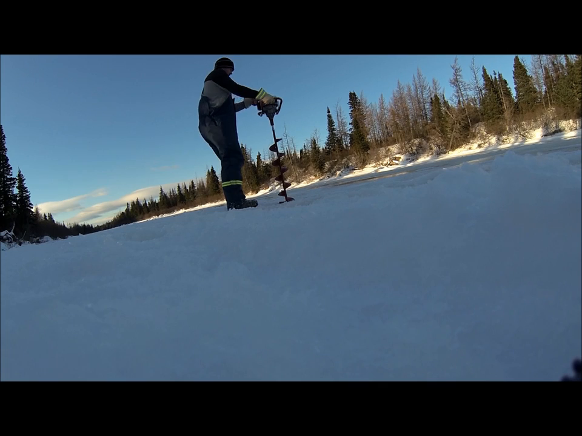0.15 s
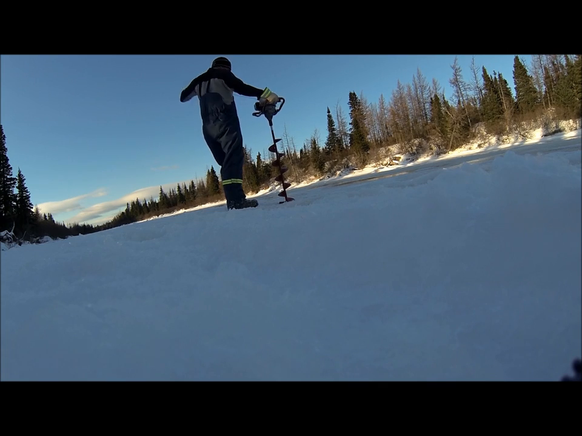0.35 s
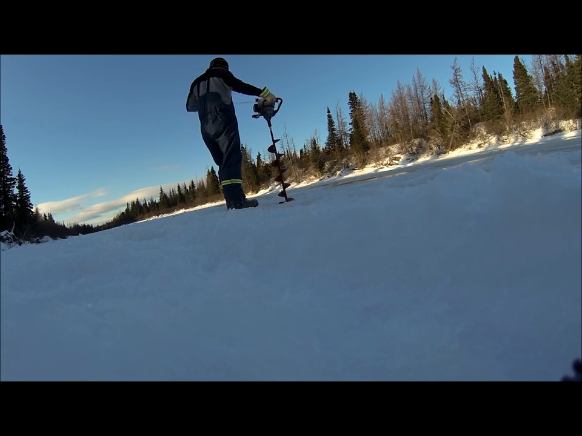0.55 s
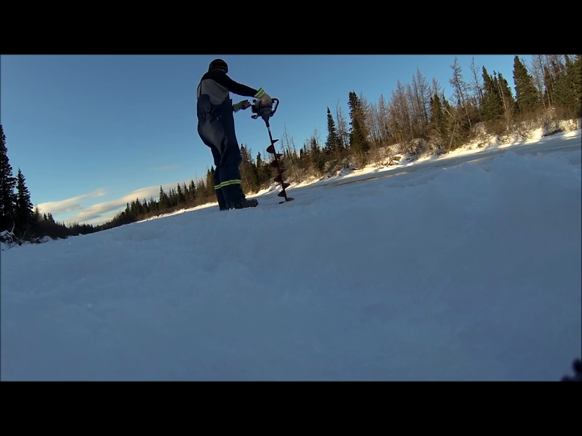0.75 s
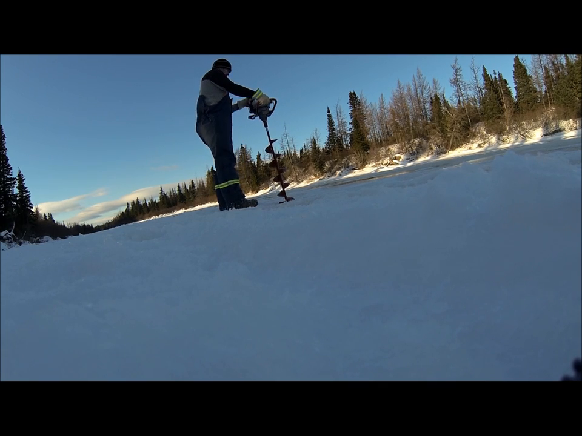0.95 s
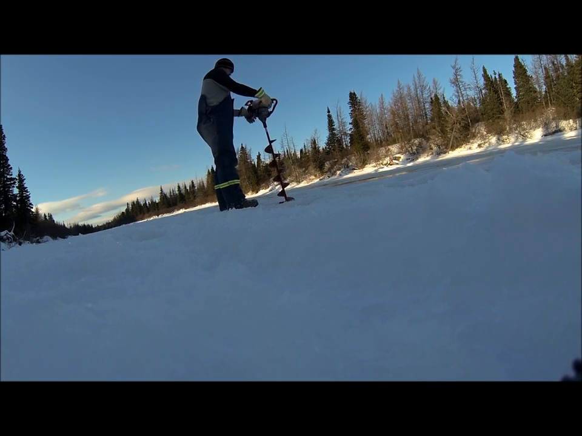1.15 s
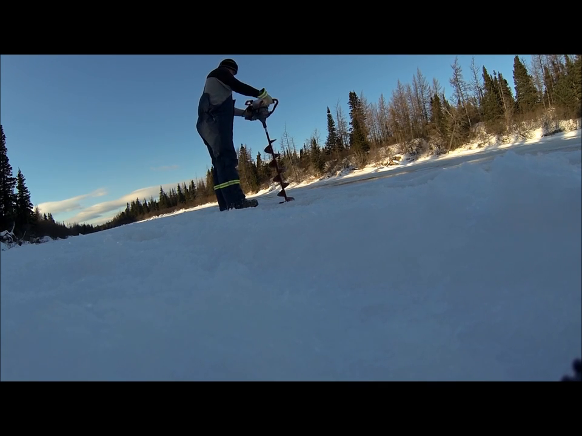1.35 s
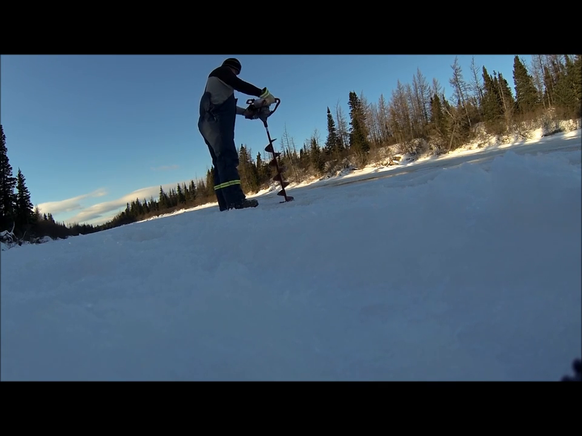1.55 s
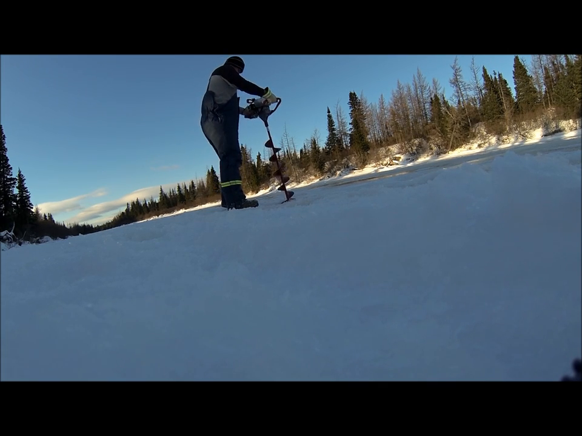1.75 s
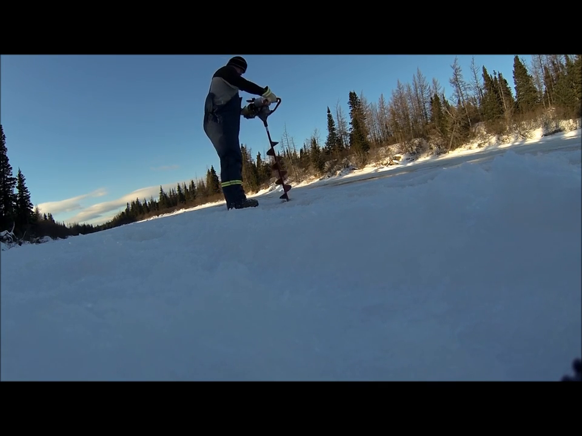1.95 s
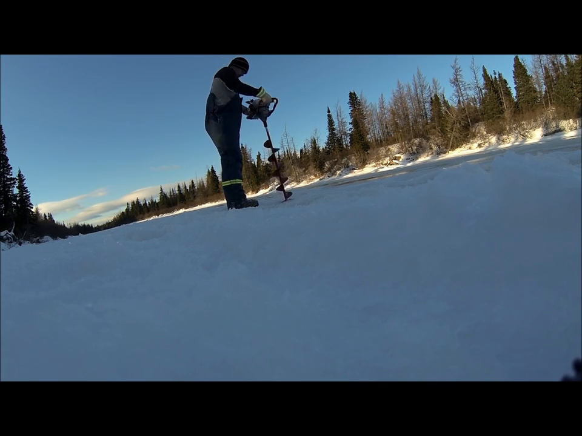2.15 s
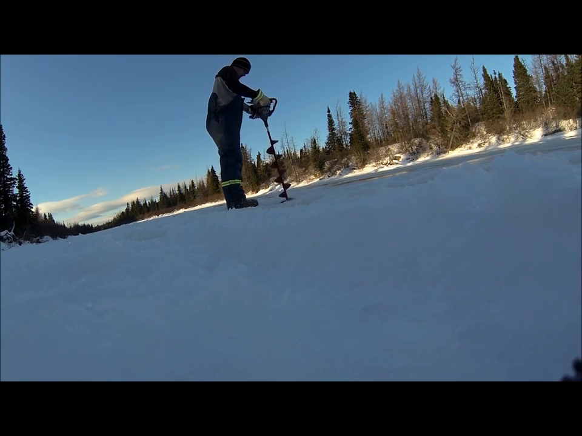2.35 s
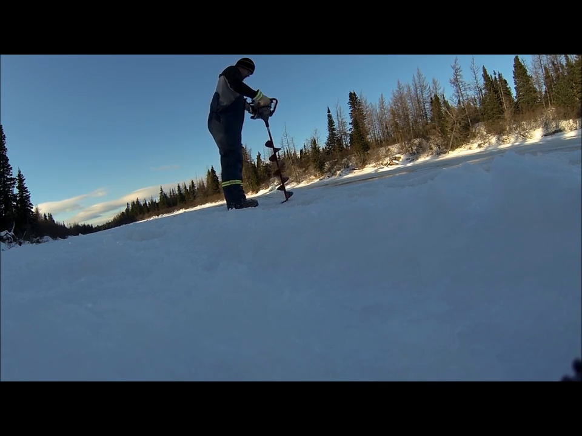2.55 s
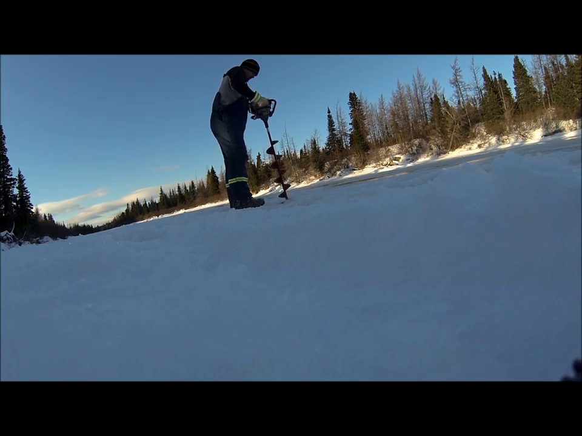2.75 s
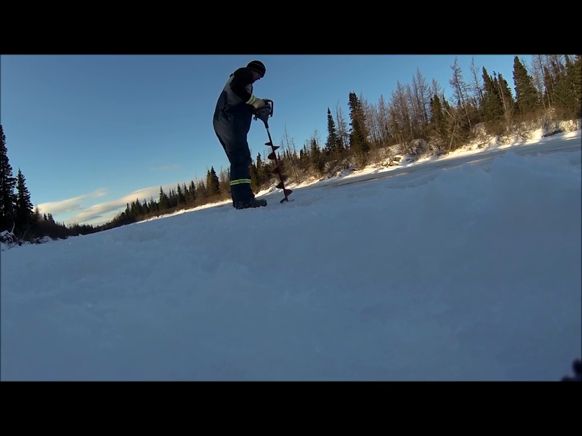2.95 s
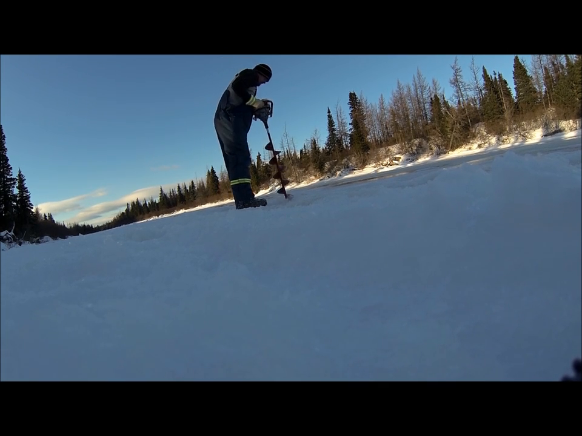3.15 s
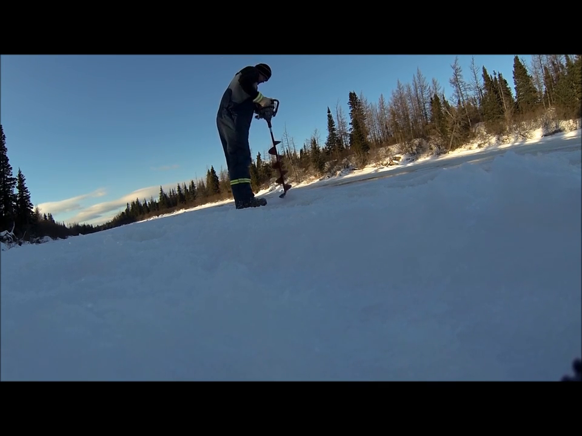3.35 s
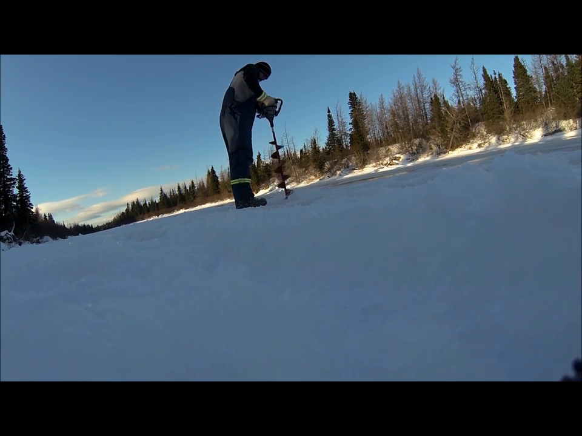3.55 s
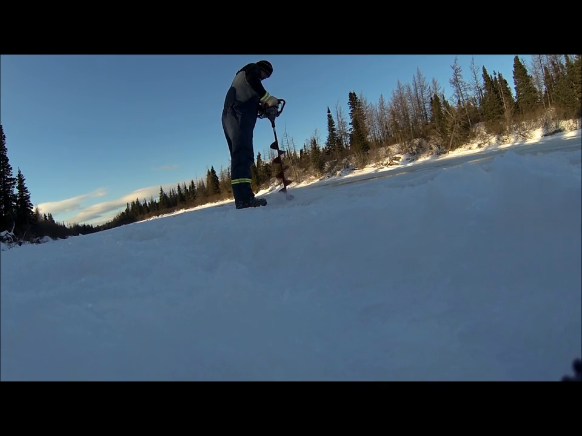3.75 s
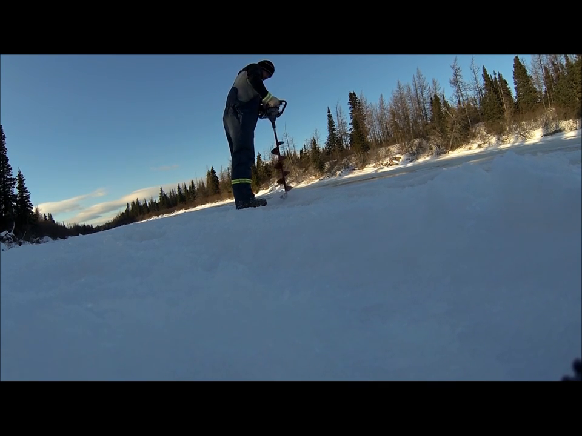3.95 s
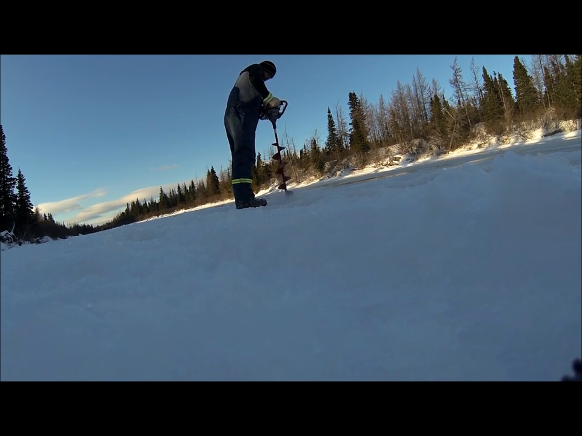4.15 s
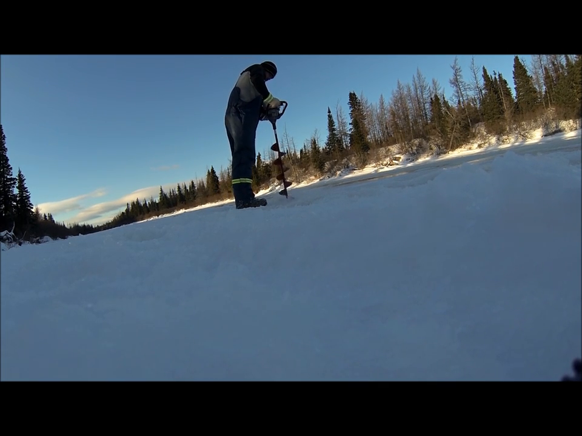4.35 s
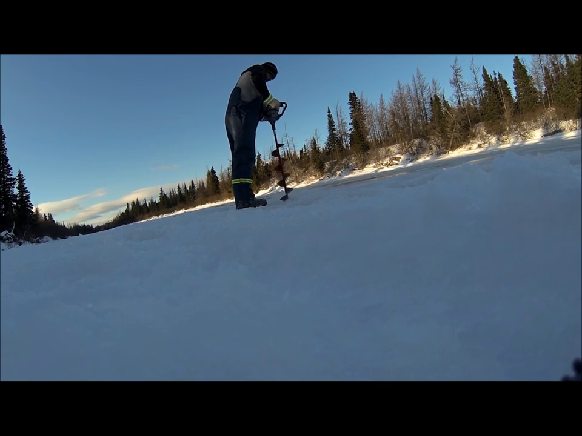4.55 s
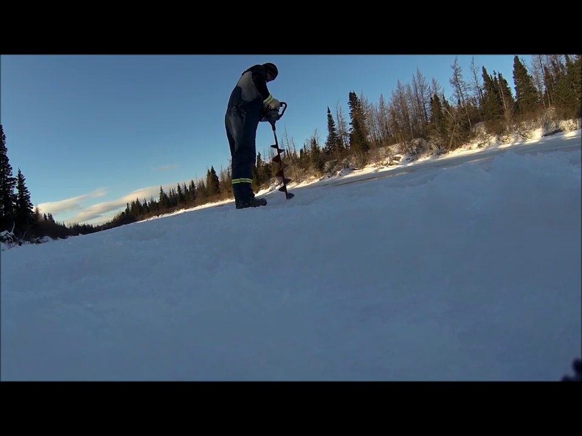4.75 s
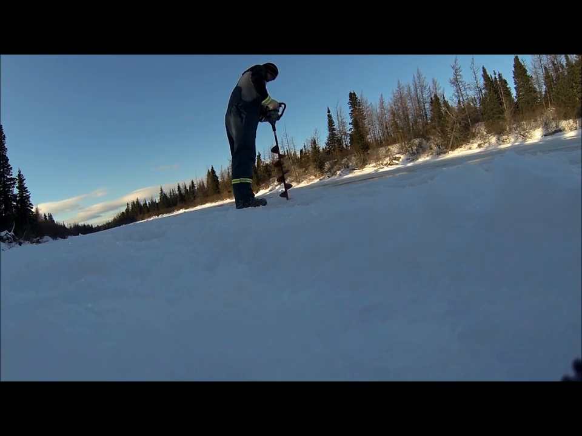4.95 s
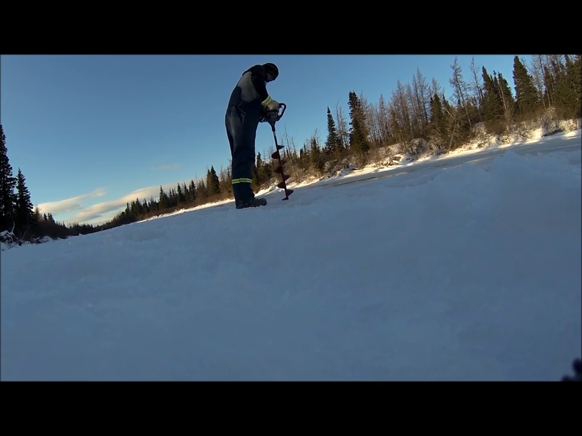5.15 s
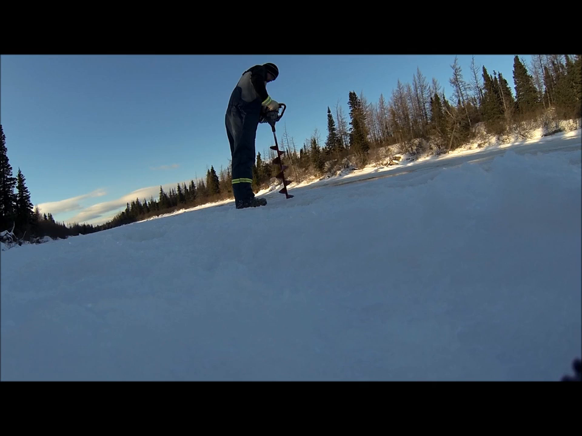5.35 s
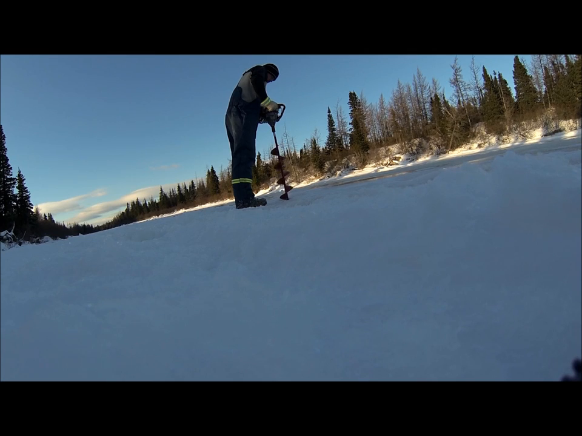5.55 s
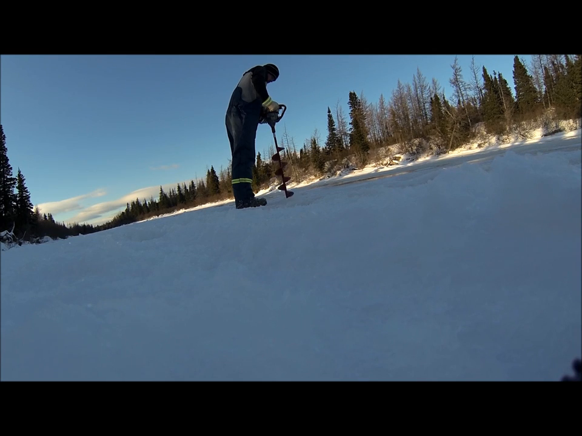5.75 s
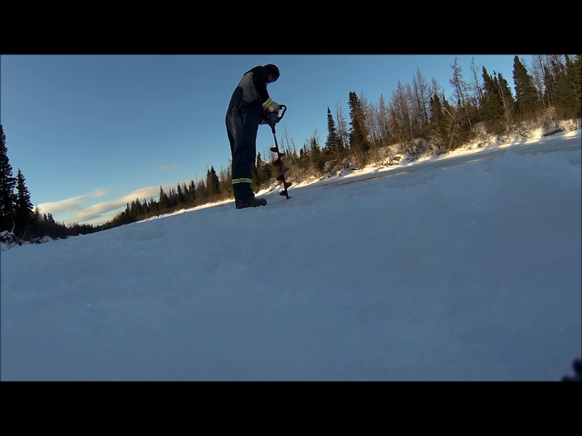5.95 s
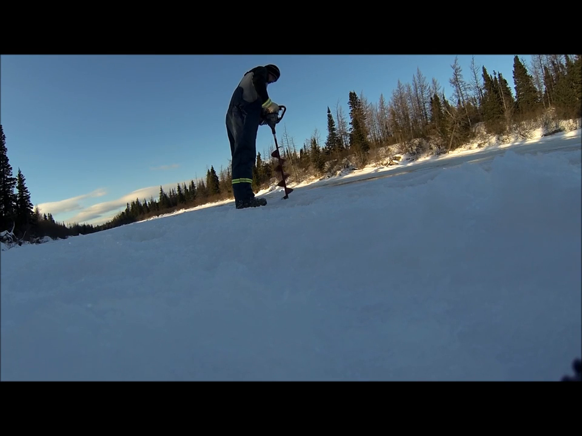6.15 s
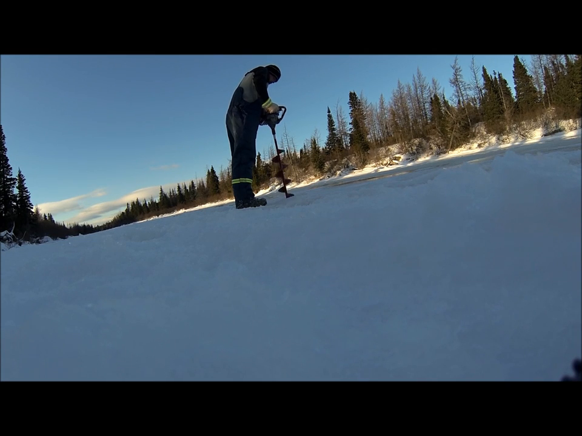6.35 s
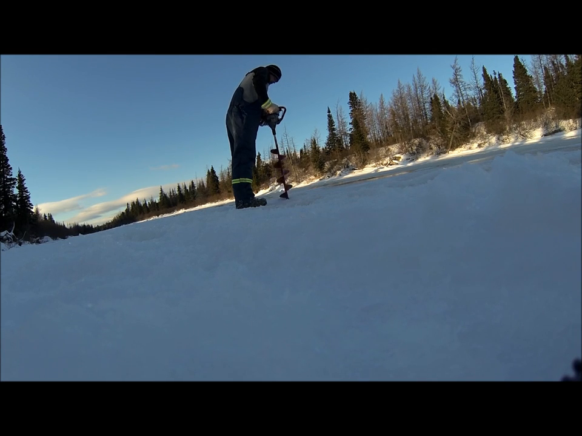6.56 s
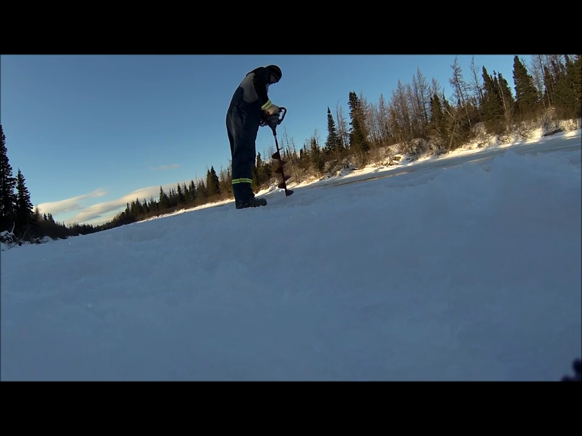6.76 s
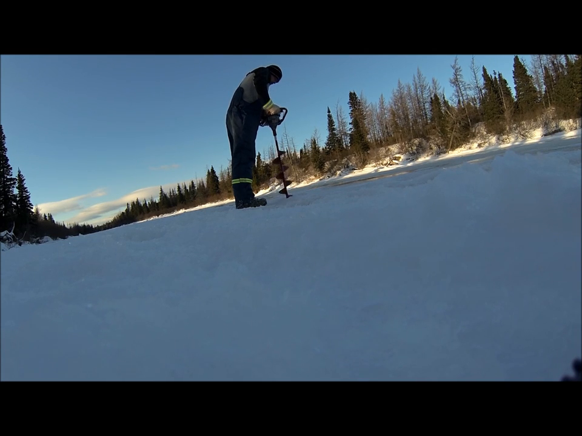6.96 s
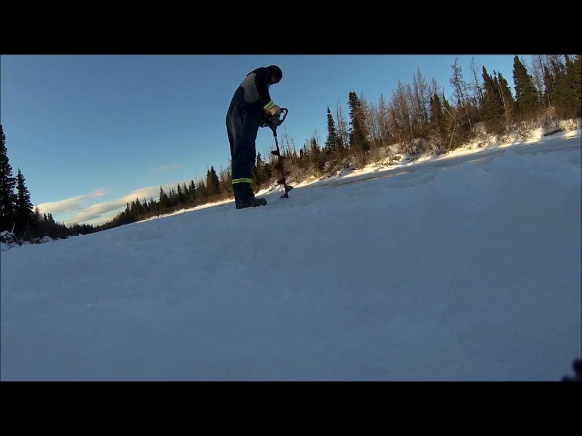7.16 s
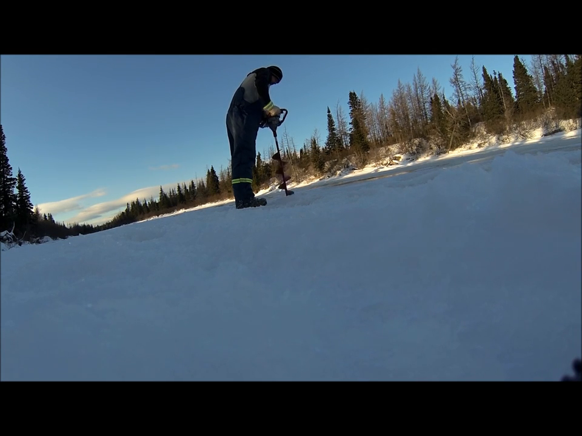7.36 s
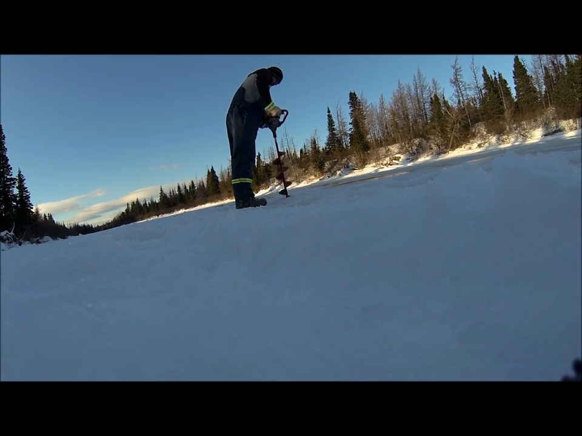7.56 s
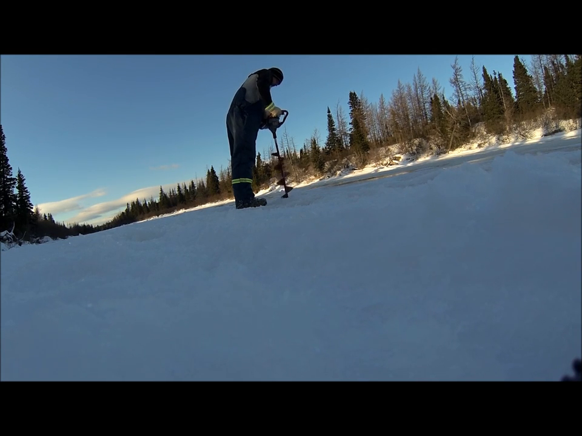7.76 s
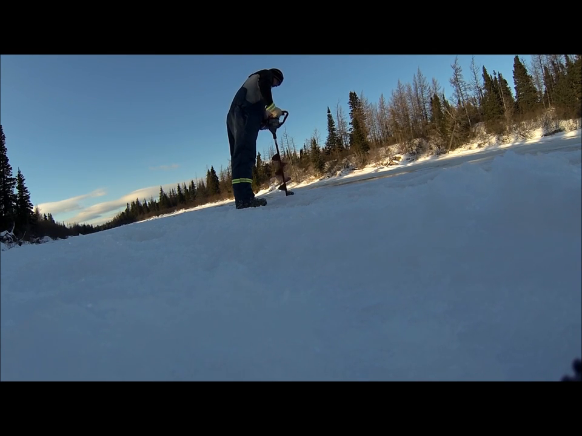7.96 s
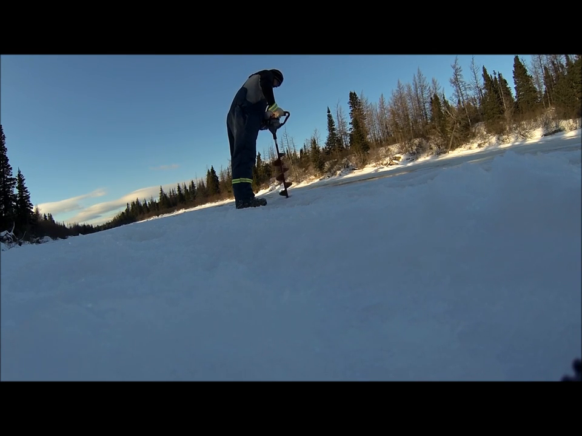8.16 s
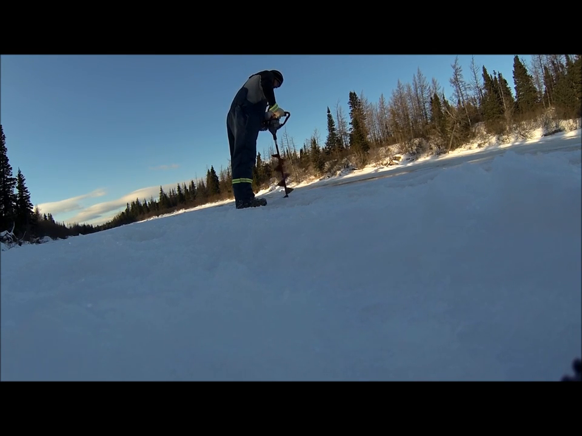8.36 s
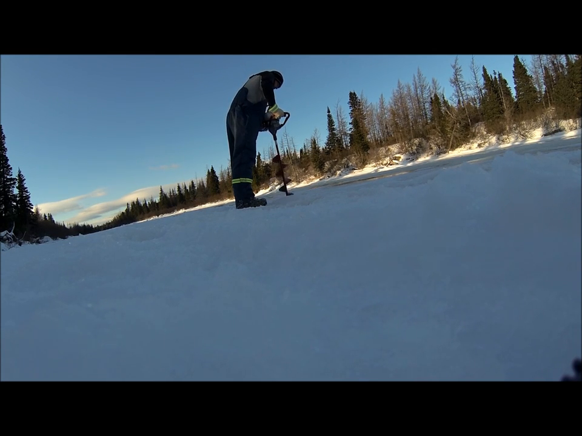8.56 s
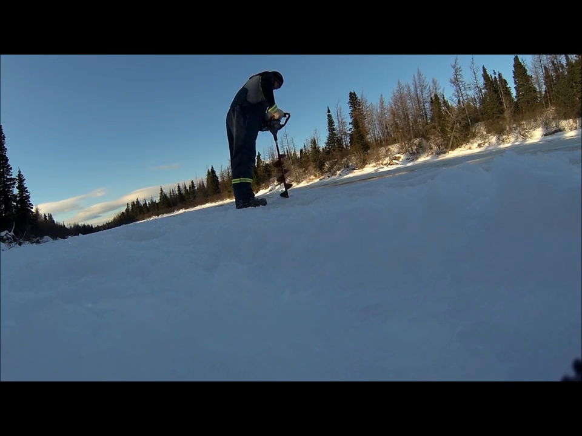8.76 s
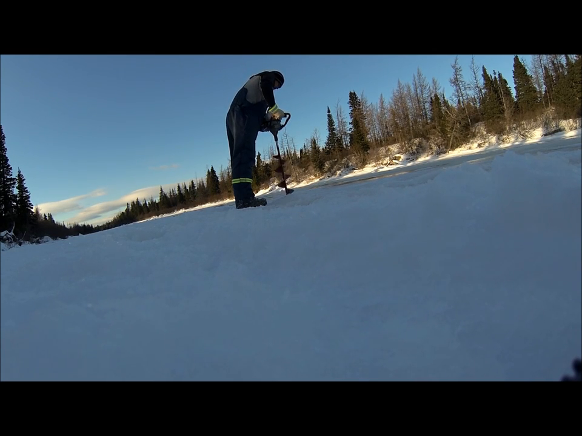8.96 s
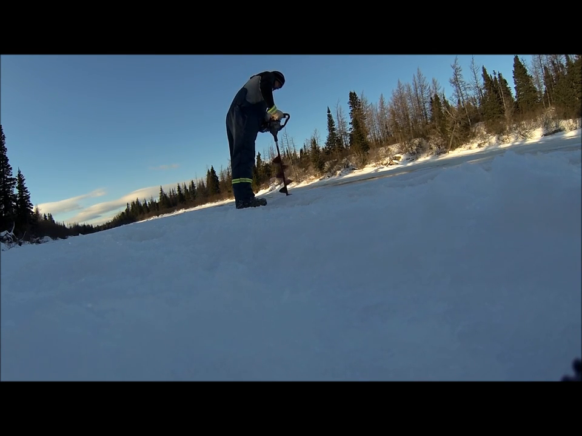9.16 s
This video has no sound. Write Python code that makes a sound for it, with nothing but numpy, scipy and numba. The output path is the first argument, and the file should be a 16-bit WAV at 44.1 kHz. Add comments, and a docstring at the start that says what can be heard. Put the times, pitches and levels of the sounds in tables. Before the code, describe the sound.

Starter clacks, a sputtering small engine catches and revs up into a harsh, buzzing drone, with faint metallic blade ringing and buffeting wind.

```python
"""Light wind buffets the microphone on a snowy lake throughout; first a two-stroke ice auger is pulled to life.
The starter clacks, the engine catches, is blipped twice and runs flat out while its blades ring on the ice.
Each turn puffs through the muffler; rich, the engine fires only every other turn; throttle shut, it coasts.
Puffs are filtered clicks, the casing rattles as shaken noise and struck rings, and hum and gears are sines.
At the end of the chain a gain control softens loud peaks."""
import sys
import numpy as np
from scipy import signal
from scipy.fft import rfft, irfft
from scipy.io import wavfile
from scipy.ndimage import uniform_filter1d
from numba import njit

SR = 44100
rng = np.random.default_rng(int(sys.argv[2]) if len(sys.argv) > 2 else 0)


def digitize_waveform(pressure):
    """Quantize a signal to 16-bit integers and store it at the path in sys.argv[1].

    Rows of a 2-D input are taken as channels; values are limited to [-1, 1].
    """
    field = np.atleast_2d(pressure).T
    bounded = np.clip(field, -1, 1)
    quanta = np.round(bounded * 32767).astype(np.int16)
    wavfile.write(sys.argv[1], SR, quanta)


N = 406602

# how the engine fires from each moment on: [t/s, fires once in so many turns (0 = coasting)]
FIRING = [(0, 0), (.72, 2), (1.06, 0), (1.31, 2), (1.53, 1), (1.67, 2), (1.77, 1), (2.05, 2), (2.18, 0),
          (2.36, 2), (2.47, 1), (2.55, 2), (2.8, 1), (2.96, 2)]
# tone of the rattling casing: [f/Hz, relative level/dB]
RATTLE = [(470, -8.5), (800, -5.5), (1310, -3.5), (1620, -3.5), (1770, 3), (2360, -0.5), (3340, 0),
          (3780, -4), (6130, -21), (6680, -10.5), (8460, -12), (10500, -19), (11300, -29), (13700, -18),
          (15600, -40)]
SLOW_HZ = 92  # shaft speed below which the engine counts as slow


def undb(db):
    """Turn decibels into a plain multiplier."""
    return 10 ** (np.asarray(db) / 20)


def level(x, db=0):
    """Scale a sound so that its average (rms) strength is the given dB."""
    return x * undb(db) / np.sqrt(np.mean(x ** 2))


def colour(x, table):
    """Give a sound the tone of a table, with a filter that never rings ahead of its input."""
    size = 4096
    hz, db = np.transpose(table)
    log_hz = np.log(np.fft.rfftfreq(size, 1 / SR) + 1)
    log_gain = np.interp(log_hz, np.log(hz), db) * np.log(10) / 20
    # folding the cepstrum (the spectrum of the log gain) puts all the ringing after the click
    cepstrum = irfft(log_gain)
    cepstrum[1:size // 2] *= 2
    cepstrum[size // 2 + 1:] = 0
    response = irfft(np.exp(rfft(cepstrum)))
    return signal.fftconvolve(x, response / np.linalg.norm(response))[:N]


def band(x, lo_hz, hi_hz):
    """Gently keep only the range between two frequencies."""
    return signal.sosfilt(signal.butter(2, [lo_hz, hi_hz], "bandpass", fs=SR, output="sos"), x)


def walk(rate):
    """Wander at random: levels held for 1 / rate seconds, then smoothed twice."""
    hold = int(SR / rate)
    steps = np.repeat(rng.standard_normal(N // hold + 1), hold)
    return uniform_filter1d(uniform_filter1d(steps, hold), hold)[:N]


def clicks(at, size):
    """Place clicks between samples by sharing each one over two neighbours."""
    whole = np.clip(at.astype(int), 0, N - 2)
    part = at - whole
    return np.bincount(whole, size * (1 - part), N) + np.bincount(whole + 1, size * part, N)


def die_away(x, seconds):
    """Let every click fade smoothly, to about a third after the given time."""
    return signal.lfilter([1], [1, -np.exp(-1 / (seconds * SR))], x)


@njit
def follow(x, attack, release):
    """Track the loudness of peaks, rising quickly and falling slowly."""
    out, e = np.empty(len(x)), .1
    for i in range(len(x)):
        e += (abs(x[i]) - e) * (attack if abs(x[i]) > e else release)
        out[i] = e
    return out


def wind():
    """Moving air presses on the microphone: lumpy rumble, gusts and thumps, over a faint hiss."""
    # average wind: [t/s, relative level/dB]
    mean_wind = [(0, -40.5), (.15, -36.5), (1, -25.5), (2.3, -29), (3.5, -33), (4.7, -29.5), (5.1, -36),
                 (6, -40), (9.22, -43)]
    # gusts: [t/s, rise above the average/dB]
    gusts = [(.17, 10), (.37, 11.5), (.68, 5), (1.0, 3), (2.31, 7), (2.75, 1), (3.2, 6.5), (3.95, -3),
             (4.2, 4), (4.8, 6), (5.21, 2), (5.42, 6), (6.44, 12), (6.73, 5), (7.47, 5), (7.78, 7),
             (8.17, 8), (8.32, 7)]
    # single thumps of air: [t/s, relative level/dB]
    air_thumps = [(0.154, -25), (0.225, -3.5), (0.444, 4), (0.665, -13), (0.929, 0.5), (1.697, 1),
                  (2.04, 1), (2.326, -16), (2.703, -1), (3.95, -3), (4.397, -12), (4.468, -17),
                  (4.758, -10), (5.429, -16), (6.438, -21)]
    gust_s, drift_db = .07, 3  # half length of a gust; strength of the random drift
    t = np.arange(N) / SR
    gust_db = sum(db * np.exp(-((t - s) / gust_s) ** 2) for s, db in gusts)
    gust = undb(np.interp(t, *np.transpose(mean_wind)) + gust_db + drift_db * walk(9.7))
    rumble = level(band(rng.standard_normal(N), 15, 55) * undb(3 * walk(25)), 2.5)
    flap = level(band(rng.standard_normal(N), 55, 200) * undb(4 * walk(20)), -4)
    s, db = np.transpose(air_thumps)
    thumps = band(band(clicks(s * SR, undb(db)), 21, 125), 21, 390) * undb(36.5)
    hiss = level(band(rng.standard_normal(N), 260, 5300), -62)
    return gust * (rumble + flap) + thumps + hiss


def blades():
    """The blades ring as they shave the ice and set a casing ring humming: narrow bands of noise that swell
    with each sweep."""
    # how hard the blades bite: [t/s, relative level/dB]
    bite = [(2.5, -60), (3.2, -48), (4.5, -38), (5.5, -39), (6.5, -38), (7, -39), (7.5, -33.5),
            (8.001, -36), (8.501, -35), (9.22, -34)]
    # rings the shaving sets off, the blades' own and a narrow casing ring at 3765 Hz: [f/Hz, width/Hz, relative
    # level/dB]
    ringing_bands = [(3350, 27, -3.5), (3765, 11, -9.5), (5240, 680, -8.5)]
    s, db = np.transpose(bite)
    t = np.arange(N) / SR
    # 7.7 sweeps a second, a little uneven
    swell_db = np.cos(2 * np.pi * 7.7 * (t - 8.02) + 1.5 * walk(1.94))
    sweep = undb(swell_db + 1.6 * walk(30))
    rings = sum(level(band(rng.standard_normal(N), f - w / 2, f + w / 2), ring_db)
                for f, w, ring_db in ringing_bands)
    return rings * sweep * undb(np.interp(t, s, db)) * (t > s[0])


def starter():
    """Cord and pawls scrape and clack: short noise bursts in the casing's tone, with dull knocks."""
    # clacks: [t/s, relative level/dB, dull knock relative to the clack/dB]
    clacks = [(0.0545, -40, -3), (0.091, -41, -9), (0.1745, -38, -11), (0.195, -22.5, -1.5),
              (0.249, -26, -12), (0.267, -27, -15), (0.3221, -23.5, -11), (0.3444, -29, -8),
              (0.3815, -32, -10)]
    s, db, knock_db = np.transpose(clacks)
    burst = die_away(clicks(s * SR, undb(db)), 0.012)
    knock = band(clicks(s * SR, undb(db + knock_db)), 520, 595) * undb(43.5)
    return burst * level(colour(rng.standard_normal(N), RATTLE), -5.5) + knock


def firing_at(seconds):
    """Look up how the engine fires at the given moments."""
    since, every = np.transpose(FIRING)
    return every[np.searchsorted(since, seconds, "right") - 1]


def loudness(t, hz):
    """Levels of hum, muffler and rattle follow the speed and the way the engine fires."""
    # loudness by speed: [shaft turns f/Hz, hum level/dB, muffler level/dB, rattle level/dB], all relative
    by_speed = [(30, -28, -31.5, -33.5), (44.5, -17, -28, -33.5), (63.6, -24, -26.5, -32.5),
                (76, -23, -24.5, -28.5), (92, -18.5, -22, -24.5), (122, -18, -22.5, -24),
                (143, -17.5, -25, -27.5), (162, -16, -22, -24), (173, -17.5, -25.5, -28)]
    # dB added to hum, muffler and rattle: coasting slowly, coasting fast, firing every turn
    coast_slow_db, coast_fast_db, every_turn_db = (-22, -0.5, 0), (-14, -3.5, 3), (2, -1, -1)
    settle_s = .04  # time over which one state blends into the next
    every = firing_at(t)
    states = [(every == 0) & (hz < SLOW_HZ), (every == 0) & (hz >= SLOW_HZ), every == 1]
    shares = uniform_filter1d(np.array(states, float), size=int(settle_s * SR))
    speed, *columns = np.transpose(by_speed)
    added = np.transpose([coast_slow_db, coast_fast_db, every_turn_db]) @ shares
    return np.array([np.interp(hz, speed, c) for c in columns]) + added


def gears(t, hz, turns):
    """Meshing gear teeth whine at fixed multiples of the shaft speed."""
    # whine tones: [multiple of shaft turns, relative level/dB]
    tones = [(14, -16), (14.5, -22), (16, -18), (18, -13), (19.6, -21), (20, -16), (21, -21)]
    free_db, loaded_s = 2, (3.1, 3.8)  # the gears sing louder until the drill is loaded
    whine = sum(undb(db + 2.5 * walk(5)) * np.sin(2 * np.pi * k * turns + .6 * walk(60))
                for k, db in tones)
    whine = whine * undb(np.interp(t, loaded_s, [free_db, 0]))
    # the gears turn once the clutch grips, and the housing passes only part of their whine
    grip = np.clip((hz - 85) / 20, 0, 1)
    return band(whine * grip, 1800, 4600)


def casing(hz, at, fired, slow, chance):
    """Each turn strikes the casing, a firing harder; it rings and its loose parts buzz."""
    # casing rings: [f/Hz, width/Hz, relative level/dB]
    resonances = [(1176, 255, -3), (1351, 83, -1), (1798, 73, -3), (2080, 200, 2), (2679, 190, -2.5),
                  (3027, 85, -7.5), (3350, 200, -4.5), (6760, 560, -14), (8630, 500, -8.5),
                  (13500, 3200, -19)]
    blows = clicks(at, np.where(fired, 1.1, .45) * undb(0.5 * chance[2]))
    rings = sum(undb(db + 2.3 * walk(7.7)) * level(band(blows, f - w / 2, f + w / 2))
                for f, w, db in resonances)
    # a shake after each blow, on top of a steady one that grows with speed
    shake = level(die_away(blows, 0.01) + 2.0 * np.minimum(hz / 140, 1) ** 0.62)
    shake = uniform_filter1d(shake, size=110)
    flutter = undb(0.84 * walk(12) + 1.25 * walk(40))
    buzz = colour(rng.standard_normal(N) * shake * flutter, RATTLE)
    # a slow firing jolts the loose parts
    jolt = die_away(clicks(at, 1. * (fired & slow)), 0.015)
    return (level(buzz, -4.0) + level(rings, -8)) * undb(1.5 * np.minimum(jolt, 1))


def muffler(at, every, fired, slow, speed, chance):
    """Each turn pushes a puff of gas through the muffler, modelled as a click with the muffler's tone."""
    # muffler tones, firing every other turn (a puff each turn plus an alternating bang),
    # firing every turn, and coasting: [f/Hz, relative level/dB]
    puff = [(100, -53.5), (200, 7), (290, -0.5), (380, 3), (465, -26), (610, -7.5), (760, -18.5),
            (1000, -33), (3000, -100.5)]
    bang = [(60, -2), (230, 1.5), (390, 3), (540, -2), (700, -13.5), (850, -22), (1100, -50), (3000, -89)]
    steady = [(80, -26), (200, 3), (350, 5), (550, 0.5), (800, -7.5), (1100, -10.5), (1500, -28),
              (2500, -11), (4000, -44), (8000, -75)]
    coast = [(60, -10), (150, 3.5), (220, 5), (280, 7.5), (370, 1.5), (480, -9.5), (600, -12), (800, -31),
             (1500, -33), (5000, -56)]
    # sharp crack of a firing: [f/Hz, relative level/dB]
    crack_tone = [(500, -35), (800, -2), (950, 8.5), (1300, 7.5), (1600, 2.5), (1800, -6.5), (2100, -11),
                  (2350, 0), (2700, -2), (3400, -5), (4500, -9), (6500, -25), (9000, -75)]
    # strength of the crack: [t/s, relative level/dB]
    crack_level = [(0, -10.5), (2, 0), (2.6, 3.5), (3.8, 0.5), (4.6, 2), (7.5, 0.5), (8.2, -0.5),
                   (9.22, -0.5)]
    # moments when the missed turns catch as well: [t/s, half length/s, share 0-1]
    catches = [(3.411, 0.016, 0.4), (3.77, 0.0081, 0.7), (7.173, .015, 0.67), (7.733, 0.016, 0.4),
               (8.303, 0.04, 0.56), (8.489, 0.073, 0.47), (8.703, 0.045, 0.53), (8.814, 0.016, 0.7),
               (8.924, 0.076, 0.67), (9.14, 0.044, 0.5)]
    full_bark_hz = 120  # below this speed a firing on every turn barks less

    # sizes fall with speed so that the level of the click train stays put
    size = np.sqrt(SR / speed) * undb(0.68 * chance[1])
    rich = size * (every == 2)
    uneven = undb(1.5 * chance[2])
    # a missed turn between two firings draws gas back: the bang turned over
    push = np.where(fired, 1, np.where(slow, -.3, -.95)) * undb(1.45 * chance[2])
    catch = sum(share * np.exp(-((at / SR - when) / half) ** 4) for when, half, share in catches)
    catch = np.clip(catch, 0, 1)
    push = (1 - catch) * push + 0.97 * catch
    out = undb(-0.5) * colour(clicks(at, rich * ~slow), puff)
    out += colour(clicks(at, rich * push), bang)

    bark = size * (every == 1) * np.minimum(speed / full_bark_hz, 1) * uneven
    out += undb(2.5) * colour(clicks(at, bark), steady)

    # when slow, every puff also rings on as when coasting, unevenly
    slow_puffs = (0.78 * rich + 0.76 * size * (every == 1)) * slow * uneven
    idle = size * (every == 0) + slow_puffs
    # when slow, the intake answers twice, about a quarter and half a turn later
    delay = (.25 + np.where(every == 0, .012, .05) * chance[1]) * SR / speed
    idle_clicks = clicks(at, idle) + clicks(at + delay, 0.5 * idle * slow)
    idle_clicks += clicks(at + 2 * delay, 0.43 * idle * slow)
    out += undb(5.0) * colour(idle_clicks, coast)

    # a slow firing thuds in the muffler can
    thud = size * slow * np.where(fired, 1, .4) * undb(5.5 * chance[0])
    out += undb(19) * band(clicks(at, thud), 80, 124)
    crack = rich * np.where(fired, 1, catch) * undb(np.interp(at / SR, *np.transpose(crack_level)))
    out += undb(-6.5) * colour(clicks(at, crack), crack_tone)
    return band(out, 30, 4500)


def shaft_hum(hz, turns, hum_db):
    """The turning shaft hums once a turn; the hum barely radiates at idle speed."""
    radiated = np.minimum(hz / 70, 1) ** 2 * np.sqrt(2)
    return radiated * undb(hum_db + 0.46 * walk(25)) * np.sin(2 * np.pi * (turns + 0.64))


def engine():
    """The shaft speed sets the moment of each turn, which drives hum, muffler, casing and gears."""
    # pull, catch, two blips, then flat out, sagging and recovering under load: [t/s, shaft turns f/Hz]
    shaft_speed = [(0.22, 40.9), (0.35, 48), (0.61, 30.3), (0.66, 30.6), (0.72, 38), (0.77, 43), (0.83, 48),
                   (0.97, 73), (1.03, 75.8), (1.3, 57.3), (1.41, 72.6), (1.61, 84.65), (1.73, 85.3),
                   (2.04, 129.3), (2.14, 134.6), (2.37, 108.5), (2.53, 125.1), (2.71, 132.2), (2.95, 154.2),
                   (3.2, 159), (3.52, 162.5), (4.23, 158.9), (4.5, 150.5), (4.9, 151.8), (5.05, 153.3),
                   (6.18, 153.7), (6.89, 158.2), (7.38, 164.4), (8.0, 160.2), (8.12, 157.7), (8.45, 156.1),
                   (8.9, 157.9), (9.22, 157.7)]
    s, speed = np.transpose(shaft_speed)
    t = np.arange(N) / SR
    hz = np.interp(t, s, speed)
    hum_db, muffler_db, rattle_db = loudness(t, hz)
    running = np.clip((t - s[0]) / .03, 0, 1)
    turns = np.cumsum(hz * running) / SR

    count = np.arange(1, int(turns[-1]))
    chance = rng.standard_normal((3, len(count)))  # small differences from turn to turn
    at = np.interp(count, turns, np.arange(N)) + SR / 40000 * chance[0]  # in samples
    every = firing_at(at / SR)
    fired = (every == 1) | (every == 2) & (count % 2 == 0)
    speed_at = hz[at.astype(int)]
    slow = speed_at < SLOW_HZ

    exhaust = muffler(at, every, fired, slow, speed_at, chance)
    hum = shaft_hum(hz, turns, hum_db)
    rattle = casing(hz, at, fired, slow, chance) + gears(t, hz, turns)
    return running * (undb(1.62) * hum - exhaust * undb(muffler_db) + rattle * undb(rattle_db))


def scene():
    """Add wind, blades, starter and engine in the open, without walls."""
    return (wind() + blades() + starter() + engine())[None]


def record(dry):
    """Gain control dips after loud peaks, and the highest treble is cut."""
    top_hz = 15550
    peaks = follow(dry[0], 1 / (0.0094 * SR), 1 / (.12 * SR))  # rises in 9.4 ms, falls in 120 ms
    held = dry * np.minimum(.36 / peaks, 1) ** .4
    return signal.sosfilt(signal.ellip(10, .2, 80, top_hz, fs=SR, output="sos"), held)


dry = scene()
out = record(dry)
digitize_waveform(out)
```